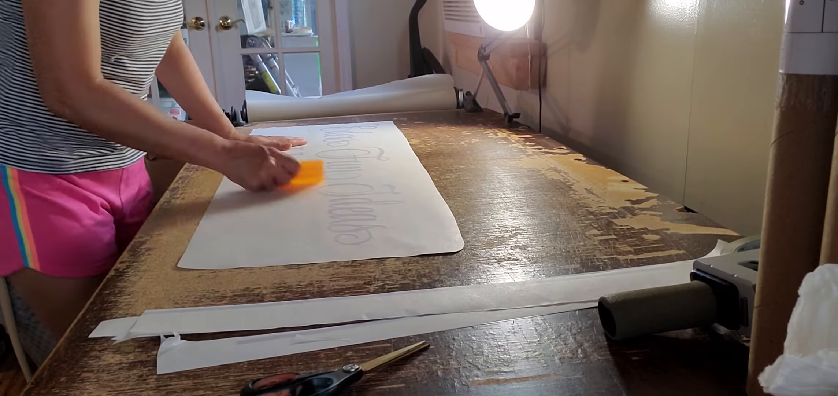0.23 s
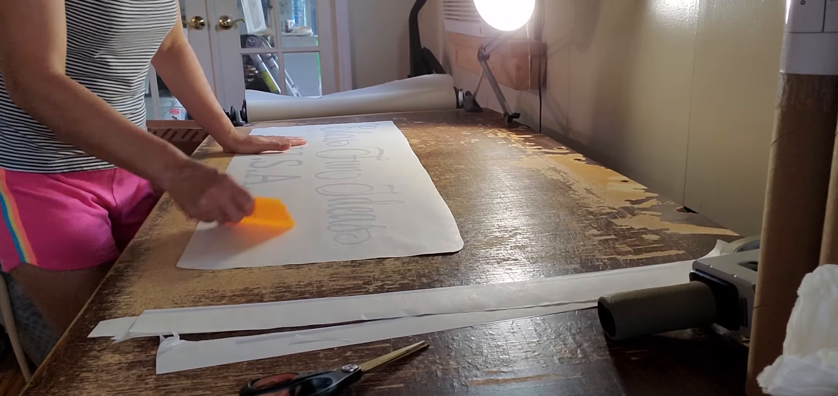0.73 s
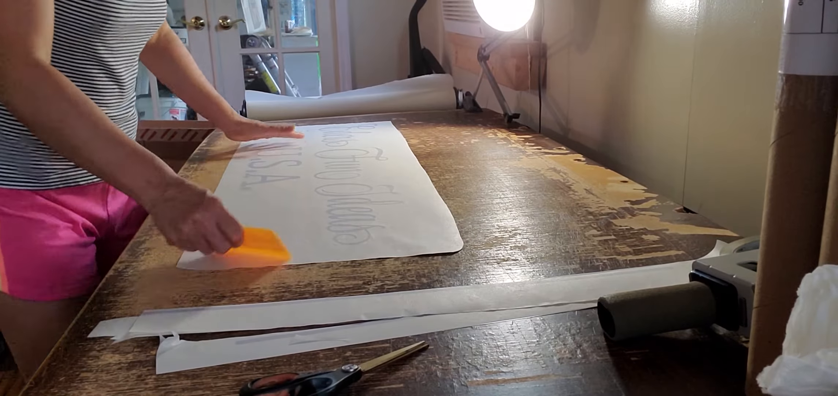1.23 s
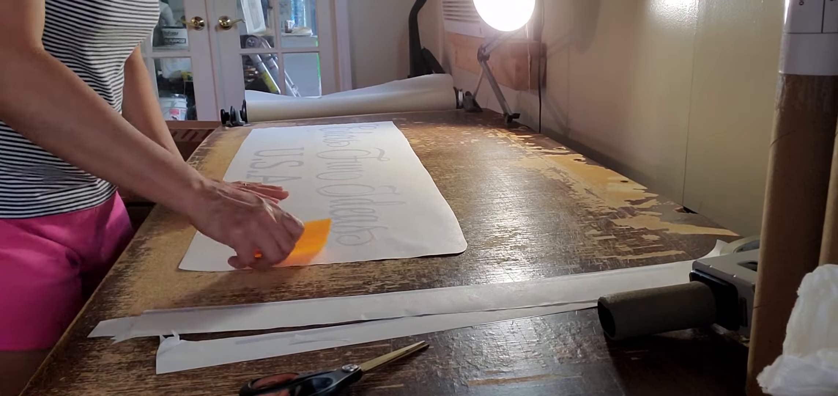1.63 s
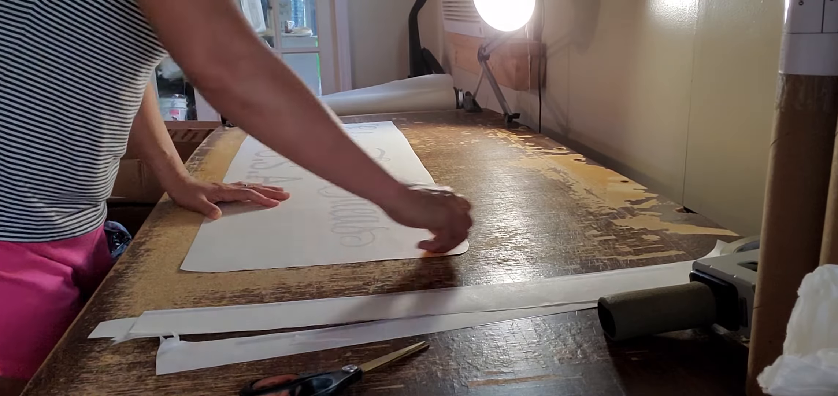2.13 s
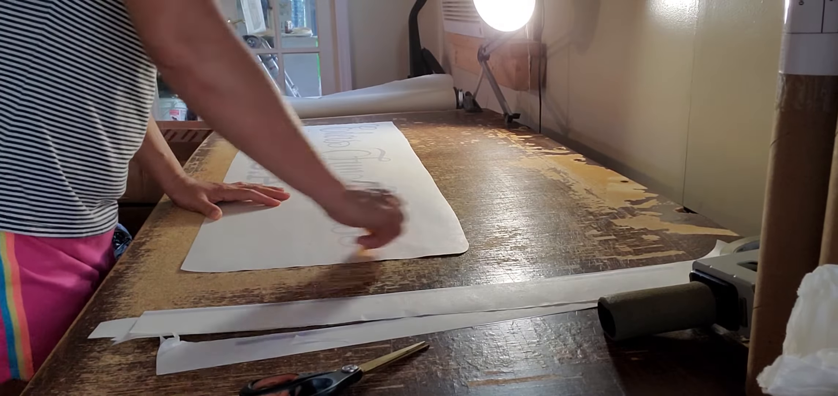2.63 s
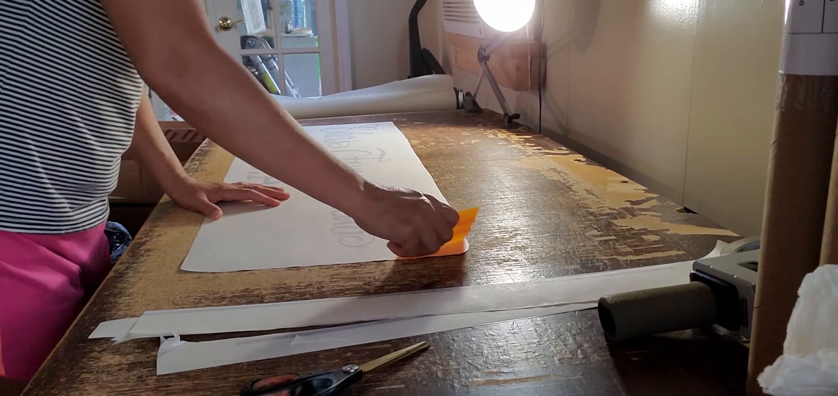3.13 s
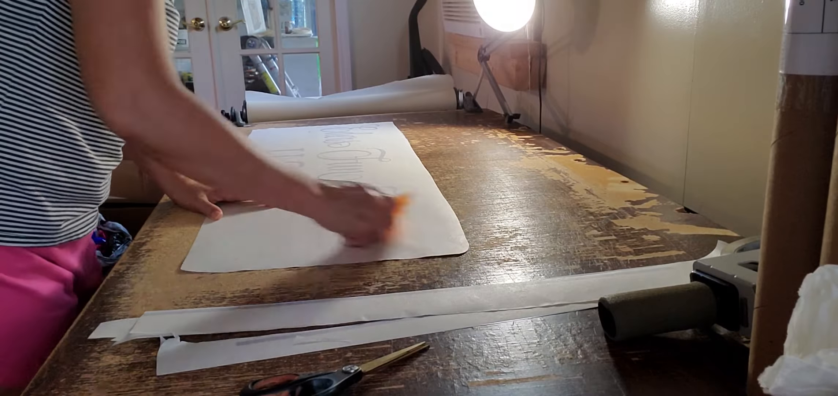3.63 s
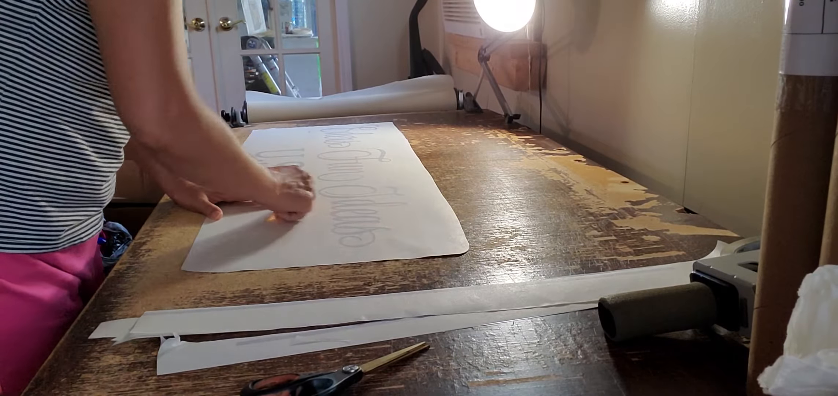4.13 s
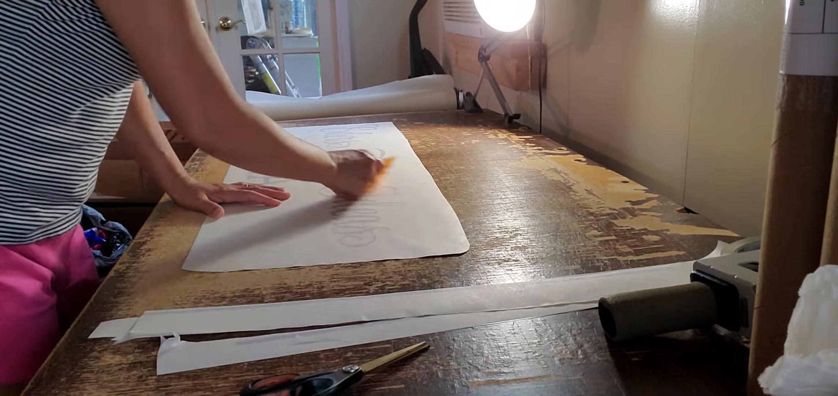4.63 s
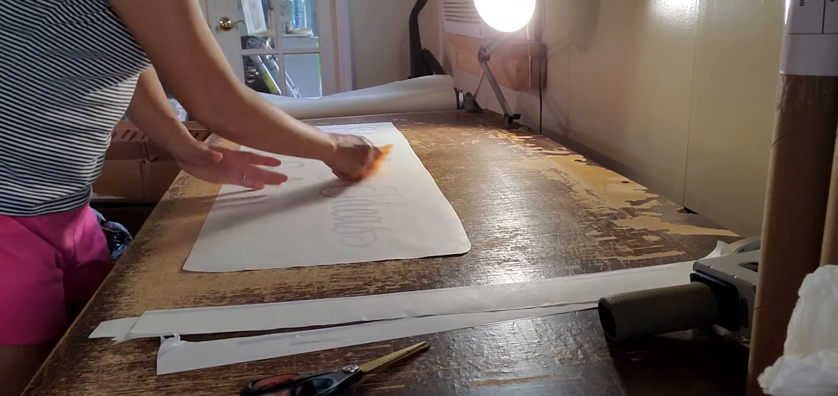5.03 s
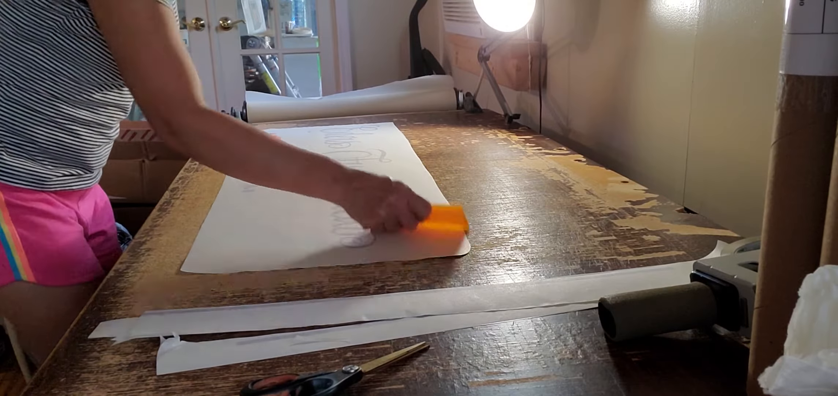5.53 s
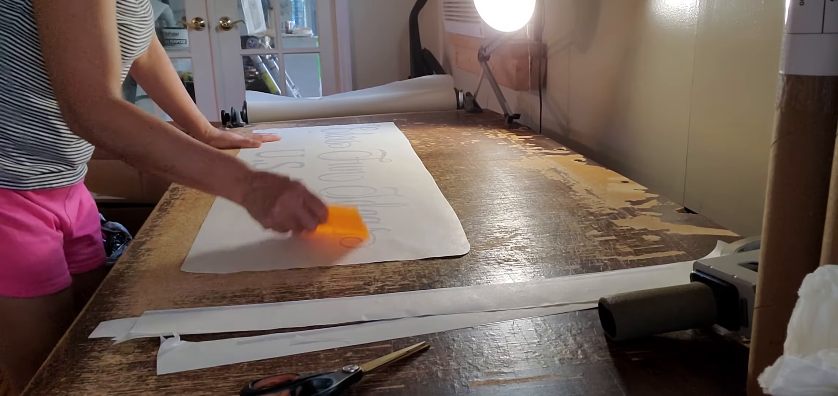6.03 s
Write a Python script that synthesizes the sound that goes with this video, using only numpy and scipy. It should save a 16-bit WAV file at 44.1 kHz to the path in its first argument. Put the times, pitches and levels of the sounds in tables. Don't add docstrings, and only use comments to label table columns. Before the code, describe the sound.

Nearby stereo pickup in a small room, the scraping slightly right of centre. A plastic squeegee is already rubbing a paper-backed sheet on a wooden table. From 0 to 1.5 s, strokes of roughly a quarter second alternate, each swelling into a nasal ring around 1.8 kHz over hollow table drumming, rasp and bright paper hiss; the first is strongest. Crease clicks come near 0.3 and 0.55 s, a sharp dry snap at 0.9 s. At 1.5 s a low thump; strokes turn weak and halting until about 2.5 s. Then quick, regular scraping resumes, with soft knocks, a crack at 3.5 s, clicks and a softer snap around 3.8 s, and a catch at 4.4 s. Near 5.35 s the edge chatters harder and brighter on bare varnish amid clustered clicks. Strong strokes continue to 6.3 s. A low fridge hum wavers beneath faint room noise.

```python
import sys
import numpy as np
from scipy import signal
from scipy.fft import rfft, irfft, next_fast_len
from scipy.io import wavfile
from scipy.ndimage import uniform_filter1d, map_coordinates

SR = 44100
rng = np.random.default_rng(int(sys.argv[2]) if len(sys.argv) > 2 else 0)


def boost(x):
    u = np.asarray(x, float) / 20
    return 10 ** u


def transcribe(u):
    v = np.clip(np.atleast_2d(u).T, -1, 1)
    q = np.round(v * 32767).astype(np.int16)
    wavfile.write(sys.argv[1], SR, q)


N = 277830


def unit(x):
    return x / np.sqrt(np.mean(x ** 2) + 1e-20)


def along(points, hz):
    f, v = np.transpose(points)
    return np.interp(np.log(hz + 1), np.log(f + 1), v)


def curves(rows):
    s, *cols = np.transpose(rows)
    return [np.interp(np.arange(N) / SR, s, c) for c in cols]


def wobble(rate):
    coarse = np.arange(0, N + 64, 64)
    knots = rng.standard_normal(int(N * rate / SR) + 4)
    return np.interp(np.arange(N), coarse, map_coordinates(knots, [coarse * rate / SR]))


def filtered(x, response):
    m = next_fast_len(N + SR // 8, True)
    gain = np.asarray(response(np.fft.rfftfreq(m, 1 / SR)), np.complex64)
    return irfft(rfft(np.float32(x), m) * gain, m)[..., :N]


def mode(hz, width, f):
    return 1j * f * width / (hz * hz - f * f + 1j * f * width)


def body(modes):
    return lambda f: sum((-1) ** k * boost(db) * mode(hz, w, f) for k, (hz, w, db) in enumerate(modes))


# frequency in Hz, level in dB per Hz.
AIR_SPECTRUM = [(25, -8), (45, 5.5), (100, -2.5), (300, -4.5), (850, -20), (1600, -5), (3600, -18),
                (5000, -20), (7300, -27), (8600, -28), (14800, -44), (16000, -35)]
# frequency in Hz, left-right likeness 0-1.
PORT_LIKENESS = [(60, 0.92), (300, 0.95), (480, 0.91), (750, 0.56), (1700, 0.53), (4000, 0.45),
                 (9000, 0.24), (15000, 0.21)]
# centre in Hz, width in Hz, level in dB.
FRAME_MODES = [(80.3, 21, 1), (114.4, 8.9, -3.5), (163, 19, -5.5), (188, 12, 1.5), (244.6, 26, -2)]


def air():
    def angle(hz):
        return np.arccos(np.clip(along(PORT_LIKENESS, hz), 0, 1)) / 2

    def mid_side(hz):
        return boost(along(AIR_SPECTRUM, hz)) * [np.cos(angle(hz)), np.sin(angle(hz))]

    mid, side = filtered(rng.standard_normal((2, N)), mid_side)
    floor = unit(np.array([mid + side, mid - side]))
    drone = unit(filtered(rng.standard_normal(N), lambda f: body(FRAME_MODES)(f) ** 2))
    return boost(-49.0) * floor + boost(-55.5 + 4.2 * wobble(4.01)) * drone


# time in seconds, level in dB.
HUM_LEVEL = [(0.0, -44), (0.19, -40), (1.45, -44.5), (1.67, -57), (2.12, -45), (2.17, -67), (2.26, -46),
             (3.35, -39.5), (4.19, -49), (4.37, -77), (4.47, -56), (5.18, -42.5), (6.04, -47), (6.3, -50)]


def fridge():
    motor_hz = 58.6 + 0.13 * wobble(2.7)
    phase = 2 * np.pi * np.cumsum(motor_hz) / SR
    level = boost(curves(HUM_LEVEL)[0] + 2.5 + 1.5 * wobble(6.8))
    return level * (np.sin(phase) + boost(-36) * np.sin(2 * phase))


# start in seconds, peak in dB, pitch in Hz.
THUMPS = [(1.52, -35.5, 194), (1.874, -46, 174), (2.3, -41, 202), (2.421, -49, 248), (2.808, -45, 188),
          (3.228, -38.5, 218), (3.939, -41, 171), (4.434, -36, 190), (5.003, -42, 242), (5.273, -34, 222),
          (5.545, -41, 153)]


def thumps():
    out, t = np.zeros(N + SR), np.arange(SR // 5) / SR
    for start_s, db, hz in THUMPS:
        envelope = boost(db + 2.5 - 60 * t / 0.21) * (1 - np.exp(-t / 0.0062))
        out[round(start_s * SR):][:len(t)] += envelope * np.sin(2 * np.pi * hz * t)
    return out[:N]


# start in seconds, peak in dB, ring in Hz.
CREASES = [(0.2886, -6.5, 1840), (0.3594, -14, 1850), (0.302, -25, 6000), (0.56, -16, 2050),
           (1.515, -20, 1520), (1.935, -36, 1970), (2.8182, -28, 3500), (3.5217, -12.5, 1700),
           (3.7532, -14, 1380), (4.441, -20.5, 1680), (4.5463, -14, 1920), (4.7505, -34, 2130),
           (5.3844, -14, 2200), (5.434, -14, 1900), (5.466, -17, 1940), (5.4722, -16, 1950),
           (5.4814, -16.5, 2180), (5.886, -18, 1690), (5.919, -15, 2000), (6.137, -13, 2320)]
# start in seconds, peak in dB.
SNAPS = [
    (0.886, -11.5),
    (3.8143, -16),
]


def catches():
    out, t = np.zeros(N + SR), np.arange(SR // 20) / SR
    for start_s, db, hz in CREASES:
        ring = boost(-60 * t / 0.023) * np.sin(2 * np.pi * hz * t)
        crack = 0.26 * boost(-60 * t / 0.004) * rng.standard_normal(len(t))
        out[round(start_s * SR):][:len(t)] += boost(db - 2.0) * (ring + crack)
    for start_s, db in SNAPS:
        treble = np.diff(rng.standard_normal(len(t) + 1))
        out[round(start_s * SR):][:len(t)] += boost(db - 2 - 60 * t / .003) * treble
    return filtered(out[:N], lambda f: mode(3100, 8500, f))


def slips(grain_db, clump_db):
    clumps = wobble(45) + 0.54 * wobble(160)
    size = boost(grain_db * rng.exponential(size=N) + clump_db * clumps)
    return unit(size * rng.standard_normal((3, N)))


# time in seconds, level in dB.
BARE_LEVEL = [(5.2, -58), (5.295, -57), (5.34, -36), (5.356, -23.5), (5.39, -21), (5.41, -26),
              (5.45, -39.5), (5.475, -38), (5.53, -63)]
# centre in Hz, width in Hz, level in dB.
VARNISH_MODES = [(870, 140, 2), (1580, 140, 6), (2240, 710, 4.5), (4360, 1200, 3), (6000, 400, 5.5),
                 (6640, 350, 1)]


def bare_wood():
    t = np.arange(N) / SR
    on = (t > BARE_LEVEL[0][0]) & (t < BARE_LEVEL[-1][0])
    chatter = unit(filtered(slips(grain_db=1.0, clump_db=0.5), lambda f: body(VARNISH_MODES)(f) ** 2))
    return on * boost(curves(BARE_LEVEL)[0] + 7.5) * chatter


# time in seconds, depth in dB, slowing in seconds,
# release in seconds.
HALTS = [(1.93, 16, 0.046, 0.003), (2.278, 8, 0.014, 0.0067), (4.432, 15, 0.0076, 0.0035),
         (5.29, 13, 0.04, 0.0064), (5.458, 8.5, 0.017, 0.0067), (1.504, 6, 0.021, 0.0049),
         (2.17, 5, 0.022, .03), (2.4, 4.5, 0.036, 0.01), (5.62, 4, .03, .012), (1.55, 5.5, 0.0054, .005),
         (4.384, 5.5, 0.019, 0.0039)]


def grip():
    t = np.arange(N) / SR
    sunk_db = sum(db * np.interp(t, [s - 2 * fall, s, s + 2 * rise], [0, 1, 0]) for s, db, fall, rise in HALTS)
    return boost(-sunk_db)


# start in seconds, share of the stroke
# where fastest, share where pressed hardest, hiss in dB.
STROKES_TO_AND_FRO = [(-0.15, 0.36, 0.45, -34.5), (0.118, 0.43, 0.64, -37), (0.418, 0.5, 0.55, -32),
                      (0.712, 0.53, 0.61, -36), (0.974, 0.38, 0.43, -32.5), (1.268, 0.61, 0.63, -34.5),
                      (1.477, 0.31, 0.35, -34.5), (1.7, 0.25, 0.3, -41), (1.91, 0.37, 0.32, -39.0),
                      (2.268, 0.55, 0.64, -42.5), (2.562, 0.46, 0.49, -36), (2.803, 0.42, 0.56, -34),
                      (3.016, 0.45, 0.49, -32.5), (3.221, 0.33, 0.43, -34.1), (3.432, 0.47, 0.46, -33),
                      (3.642, 0.56, 0.61, -36), (3.845, 0.49, 0.48, -34.5), (4.03, 0.36, 0.61, -35),
                      (4.217, 0.59, 0.55, -34), (4.421, 0.42, 0.49, -35), (4.657, 0.58, 0.6, -33),
                      (4.935, 0.27, 0.42, -37.5), (5.213, 0.43, 0.59, -33.5), (5.535, 0.5, 0.57, -35.5),
                      (5.792, 0.45, 0.58, -35.5), (6.053, 0.52, 0.64, -36)]
LAST_TURN_S = 6.31


def progress():
    turns = np.append(np.transpose(STROKES_TO_AND_FRO)[0], LAST_TURN_S)
    place = np.interp(np.arange(N) / SR, turns, np.arange(len(turns)) - 1e-9)
    which = np.clip(place.astype(int), 0, len(STROKES_TO_AND_FRO) - 1)
    return which, np.clip(place - which, 0, 1)


def arch(top):
    which, share = progress()
    top = np.clip(top, .1, .9)[which]
    return np.sin(np.pi / 2 * np.minimum(share / top, (1 - share) / (1 - top)))


# share where the table drums most, table pitch in Hz mid-stroke,
# pointedness of the press, motion kept through the opening turn as a factor.
STROKE_MANNER = [(0.49, 760, 1.38, 1), (0.59, 650, 1.01, 0.83), (0.51, 750, 1.06, 1.2),
                 (0.4, 540, 1.14, 0.74), (0.44, 820, 0.91, 1), (0.54, 600, 0.97, .9),
                 (0.2, 640, 0.74, 1.16), (0.56, 590, 0.78, 0.46), (0.11, 690, 0.93, 1.6),
                 (0.74, 550, 1.1, 1.58), (0.45, 670, 1.3, .8), (0.45, 506, 0.89, 1.05),
                 (0.45, 650, 1.3, 1.1), (0.49, 520, 1.3, 1.36), (0.43, 680, 1.4, 1.1),
                 (0.74, 530, 1.53, 1.27), (0.53, 670, 1.2, 1.48), (0.56, 420, 0.98, 0.82),
                 (0.7, 640, 0.75, 1.4), (.4, 720, 1.25, 2.05), (0.54, 610, 1.16, 1.17),
                 (0.42, 660, 1.44, 0.68), (0.44, 700, 1.08, 0.84), (0.62, 695, 1.42, 1.48),
                 (0.5, 580, 1.27, 1.14), (0.49, 680, 1.18, 1.17)]


def follows(effort, peak_db, power, rest, pointed):
    which, share = progress()
    kept = np.append(np.transpose(STROKE_MANNER)[3], 1)
    nearest_turn = np.where(share < .5, kept[which], kept[which + 1])
    rest = np.clip(rest * nearest_turn, 0, .9)
    gain = boost(peak_db)[which] * (rest + (1 - rest) * effort ** pointed) ** power
    return uniform_filter1d(gain, size=SR // 100)


def favoured(push, modes, centre_hz, slope_db, fickle_db):
    hz, width, db = np.transpose(modes)[..., None]
    fickle = np.array([wobble(20) for _ in modes])
    octaves_off = np.abs(np.log2(hz) - np.log2(centre_hz))
    weight = np.float32(boost(db - slope_db * octaves_off + fickle_db * fickle))
    sign = (-1.) ** np.arange(len(modes))[:, None]
    rings = filtered(push, lambda f: (sign * mode(hz, width, f) ** 2 / np.sqrt(width))[:, None])
    return unit(np.einsum("mn,mcn->cn", weight, rings) / np.linalg.norm(weight, axis=0))


# blade in dB, table in dB, rasp in dB, bent-blade pitch in Hz.
STROKE_BEARING = [(-17, -29.5, -28, 1820), (-23, -29, -31.5, 1880), (-23.3, -33, -31.5, 1840),
                  (-25.5, -30, -34, 1780), (-23.5, -33.5, -31.5, 1890), (-28, -33, -37.2, 1790),
                  (-25.5, -33.5, -34, 1800), (-41, -35, -43, 1820), (-31, -37.9, -32.5, 2000),
                  (-34.5, -35.5, -37.5, 1820), (-29.5, -36, -30, 1850), (-28, -29.5, -33, 1730.0),
                  (-26, -34.6, -30.5, 1680), (-28, -28, -33, 1720), (-26.5, -33.5, -33, 1730),
                  (-26, -29, -34.5, 1790), (-26, -33.5, -33, 1790), (-28.5, -30, -36, 1810),
                  (-28.5, -34.5, -35, 1760), (-24, -27.7, -33, 1860), (-24, -33.0, -33, 1790),
                  (-23.5, -27.5, -31, 1820), (-25.0, -36, -30.5, 1880), (-24, -29, -31.5, 1800),
                  (-24.5, -33, -31.5, 1750), (-23, -27.5, -31, 1810)]
# centre in Hz, width in Hz, level in dB.
BLADE_MODES = [(1443, 397, 2.5), (1570, 292, 2.5), (1721, 337, 0), (1950, 270, -1.5), (2139, 200, 1.5),
               (2430, 660, 0)]
# centre in Hz, width in Hz, level in dB.
TABLE_MODES = [(322, 81, 1), (371.5, 56, -0.5), (446.6, 68, 4), (521.6, 61, -6.5), (637, 126, 1.5),
               (799.5, 174, 5), (947, 167, 4), (1123, 290, 3.5)]
# centre in Hz, width in Hz, level in dB.
RASP_MODES = [(2760, 690, 3), (3650, 855, 1.5), (4580, 650, -5.5), (5800, 650, -9.5), (6920, 390, -9.5)]
# frequency in Hz, level in dB per Hz.
HISS_SPECTRUM = [(3820, -13.5), (6500, 0.5), (9050, -4), (12000, 0.5), (15100, -0.5), (15700, -6),
                 (16200, -26), (16500, -43)]


def scrape():
    _, fastest, hardest, hiss_db = np.transpose(STROKES_TO_AND_FRO)
    blade_db, table_db, rasp_db, bent_hz = np.transpose(STROKE_BEARING)
    drummed, middle_hz, pointed, _ = np.transpose(STROKE_MANNER)
    which, share = progress()
    pointed = pointed[which]
    press = arch(hardest)
    slide_starts = .15
    speed = np.clip((arch(fastest) - slide_starts) / (1 - slide_starts), 0, 1)

    slack_hz = 1900
    bend_hz = slack_hz + 1.53 * (bent_hz[which] - slack_hz) * press
    glide_oct = np.array([-0.065, 0.29])[which % 2]
    spot_hz = middle_hz[which] * 2 ** (glide_oct * (share - .5))

    push = slips(grain_db=2.5, clump_db=1.5)
    blade = favoured(push, BLADE_MODES, bend_hz, slope_db=15.5, fickle_db=2.5)
    table = favoured(push, TABLE_MODES, spot_hz, slope_db=8.5, fickle_db=3.0)
    legs = unit(filtered(push, lambda f: body(FRAME_MODES)(f) * mode(225, 146, f)))
    rasp = unit(filtered(push, lambda f: body(RASP_MODES)(f) * mode(4870, 2760, f)))
    grain = slips(grain_db=1.5, clump_db=1.36)
    hiss = unit(filtered(grain, lambda f: boost(along(HISS_SPECTRUM, f))))

    ringing = follows(press, blade_db, power=3.62, rest=0.32, pointed=pointed)
    drumming = follows(arch(drummed), table_db, power=2.17, rest=0.23, pointed=pointed)
    rasping = follows(arch((hardest + fastest) / 2), rasp_db, power=2.33, rest=0.31, pointed=pointed)
    sliding = follows(speed, hiss_db, power=1.09, rest=0.06, pointed=pointed ** 0.13)
    sliding = sliding + boost(curves(BARE_LEVEL)[0] - 5.0)

    drum = boost(1.18) * drumming * table + boost(-32.0) * drumming ** 0.54 * legs
    edge = boost(2.0) * ringing * blade + boost(1.5) * rasping * rasp
    held = grip()
    return held * (edge + drum) + held ** 0.62 * boost(3.5) * sliding * hiss


# time in seconds, left minus right in dB.
HAND_PLACE = [(.25, -2.4), (1.75, -2.1), (2.2, -.6), (3.75, -.5), (4.2, -1.6), (6.2, -1.3)]
# time in seconds, left lag in samples.
LEFT_LAG = [(.25, 4), (1.25, 6), (1.75, 6), (2.75, 3), (3.75, 2), (4.75, 2), (5.25, 0), (6.2, 4)]


def ports(trio):
    pan_db, lag = curves(HAND_PLACE)[0], curves(LEFT_LAG)[0]

    def alike(hz):
        return np.clip(along(PORT_LIKENESS, hz), 0, 1)

    shared = filtered(trio[0], lambda hz: np.sqrt(alike(hz)))
    late = map_coordinates(shared, [np.clip(np.arange(N) - lag, 0, N - 1)], order=3)
    own = filtered(trio[1:], lambda hz: np.sqrt(1 - alike(hz)))
    return (np.array([late, shared]) + own) * boost(np.array([pan_db, -pan_db]) / 2)


# frequency in Hz, time to fall 60 dB in seconds.
ROOM_DECAY = [(200, 0.6), (2000, 0.2), (10000, 0.023)]


def room(x):
    hz, t, z = signal.stft(rng.standard_normal((2, SR // 2)), SR, nperseg=256)
    decay = boost(-60 * t / along(ROOM_DECAY, hz)[:, None])
    scattered = (hz / (hz + 640))[:, None]
    tail = signal.istft(z * decay * scattered, SR, nperseg=256)[1]
    return signal.oaconvolve(x, tail / np.linalg.norm(tail[0]), axes=1)[:, :N]


# frequency in Hz, left minus right in dB.
PORT_COLOUR = [(60, -2), (180, 1), (550, -0.5), (1650, -2), (4970, -1.0), (15000, -1.5)]


def scene():
    hand = ports(scrape() + bare_wood() + catches())
    hand = filtered(hand, lambda hz: boost(np.outer([.5, -.5], along(PORT_COLOUR, hz) + 1.3)))
    return hand + boost(-17) * room(hand) + thumps() + fridge() + air()


def low_pass(x):
    return signal.sosfilt(signal.butter(12, 17000, fs=SR, output="sos"), x)


def record(dry):
    held = dry / (1 + np.abs(dry / .95) ** 4) ** (1 / 4)
    top_hz = 15980
    return low_pass(np.float64(filtered(held, lambda hz: hz < top_hz)))


dry = scene()
out = record(dry)
transcribe(out)
```